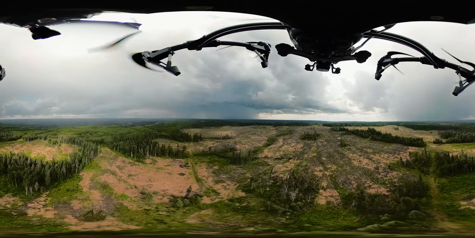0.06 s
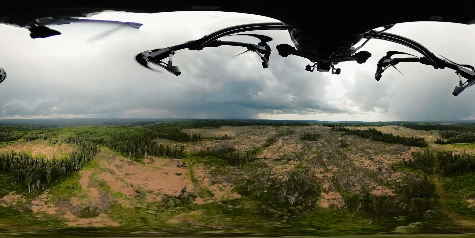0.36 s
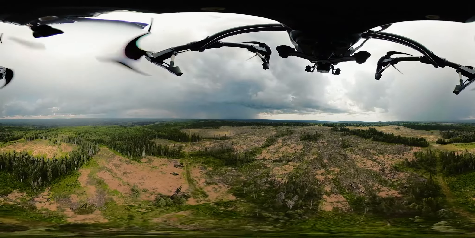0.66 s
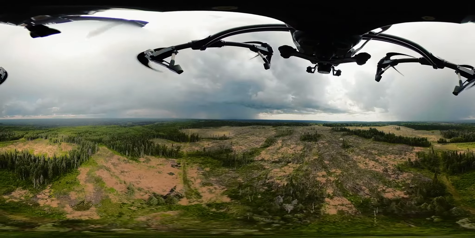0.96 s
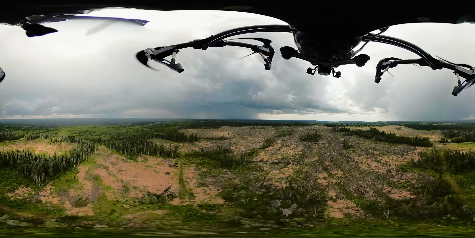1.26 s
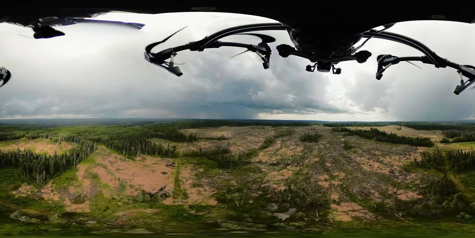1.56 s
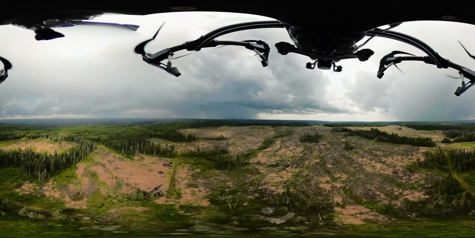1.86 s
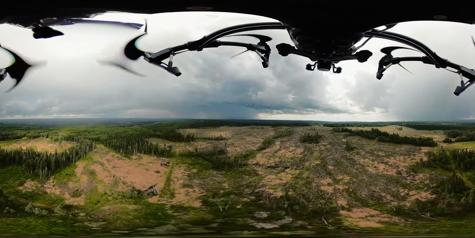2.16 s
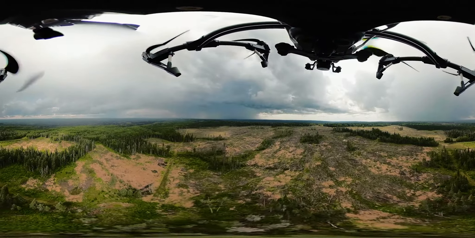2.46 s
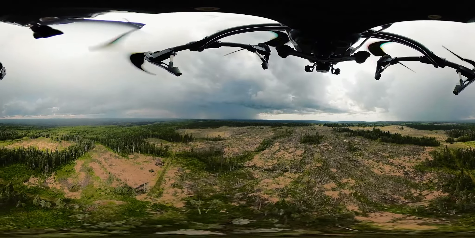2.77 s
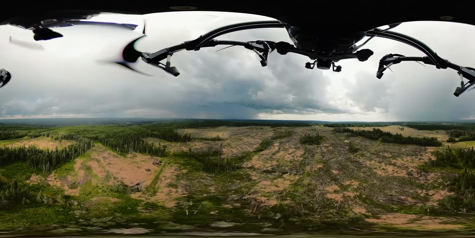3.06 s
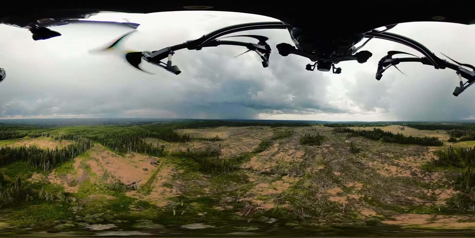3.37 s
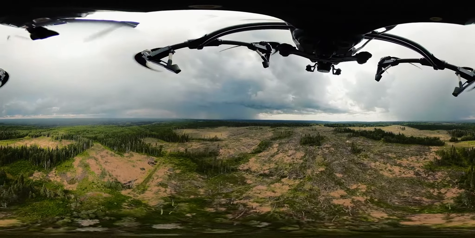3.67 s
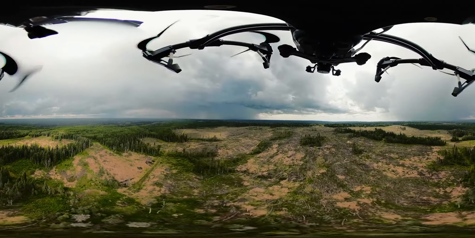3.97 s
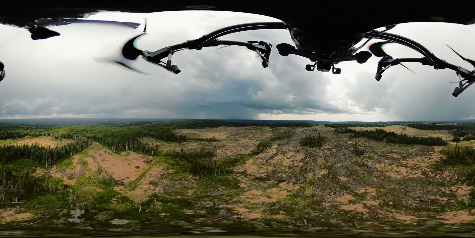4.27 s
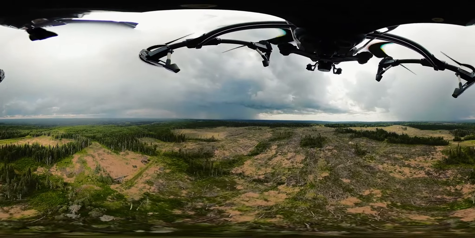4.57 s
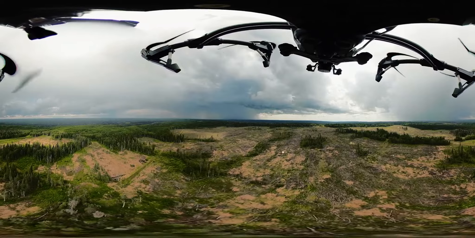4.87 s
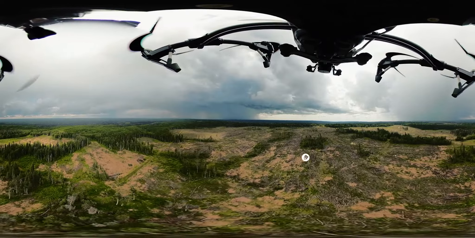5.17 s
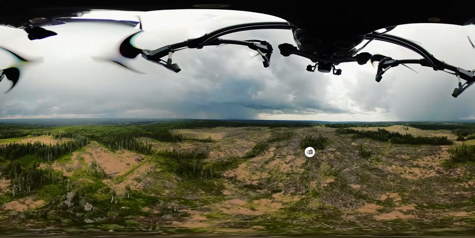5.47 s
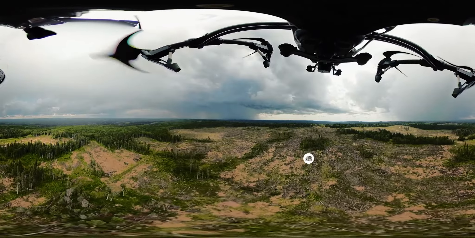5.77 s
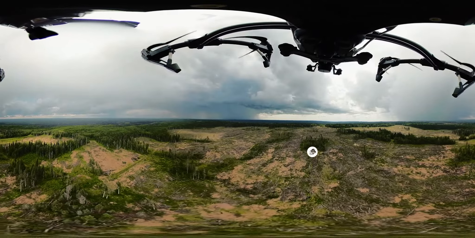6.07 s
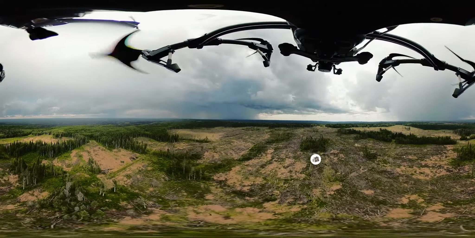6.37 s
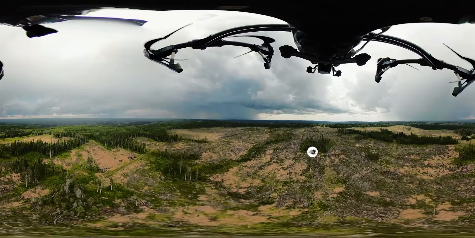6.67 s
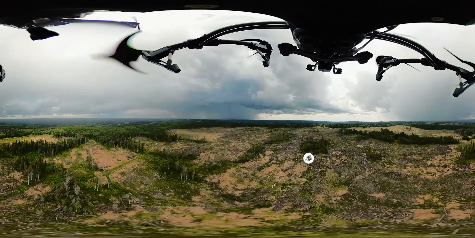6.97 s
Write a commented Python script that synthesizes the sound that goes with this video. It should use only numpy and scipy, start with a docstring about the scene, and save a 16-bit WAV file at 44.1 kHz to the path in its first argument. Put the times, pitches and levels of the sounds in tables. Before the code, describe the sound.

A low, rough rumble of tumbling air runs from start to finish, heard from a microphone carried by a drone in the open air. Gusts and the downdraft from the rotors keep striking it with short, uneven thumps. A faint, high, finely pulsing hiss from the blades sits far behind the wind, along with an occasional thin tick.

```python
"""Wind and rotor wash (air pushed down by the blades) rumble on a flying drone's camera microphone.
The air tumbles past in gusts, full of eddies: swirls of every size. Single strong eddies thump and rasp.
Much more quietly, the blades hiss in pulses as they sweep past,
and the hardest gusts carry thin, bright ticks."""
import sys
import numpy as np
from scipy import signal
from scipy.fft import rfft, irfft
from scipy.io import wavfile
from scipy.ndimage import uniform_filter1d

SR = 44100
rng = np.random.default_rng(int(sys.argv[2]) if len(sys.argv) > 2 else 0)


def digitize_waveform(pressure):
    """Quantize a signal to 16-bit integers and store it at the path in sys.argv[1].

    Rows of a 2-D input are taken as channels; values are limited to [-1, 1].
    """
    field = np.atleast_2d(pressure).T
    bounded = np.clip(field, -1, 1)
    quanta = np.round(bounded * 32767).astype(np.int16)
    wavfile.write(sys.argv[1], SR, quanta)


N = 313551
TIME = np.arange(N) / SR
FREQ = np.maximum(np.arange(N // 2 + 1) * SR / N, 1)

# How strong the tumbling air is at each frequency: frequency_hz, gain_db
WIND_TONE = [(10, -27.5), (25, -15.5), (42, -6.5), (60, -10.5), (100, -6.5), (140, -2.5), (190, 1),
             (260, -4.5), (370, -13), (550, -21), (1000, -32.5), (2000, -48), (4000, -66), (10000, -93.5)]
# Strong eddies that hit the microphone: time_s, relative_thump_db, relative_rasp_db
STRONG_EDDIES = [(0.106, -34, -39.5), (0.239, -9.5, -35), (0.309, -16.5, -53.5), (0.345, -18.5, -56),
                 (0.366, -19, -53), (0.408, -19, -37.5), (0.472, -15, -47), (0.506, -13.5, -51),
                 (0.649, -20, -44), (0.719, -16, -61), (0.828, -22.5, -44.5), (1.07, -12.5, -50),
                 (1.383, -27, -43.5), (1.425, -20.5, -45.5), (1.735, -16, -50), (2.171, -23, -44),
                 (2.224, -20, -47), (2.296, -15, -42), (2.368, -19.5, -46.5), (2.411, -22.5, -53.5),
                 (2.774, -30, -49.5), (2.824, -21.5, -44.5), (2.956, -25.5, -47), (3.138, -11.5, -38),
                 (3.274, -16.5, -41.5), (3.355, -18, -44), (3.584, -13, -36.5), (3.788, -15.5, -48),
                 (3.832, -21, -45), (3.966, -13, -60), (4.139, -24.5, -39.5), (4.511, -26.5, -42),
                 (4.616, -12, -45.5), (4.829, -15, -44.5), (4.923, -21, -43), (5.133, -13.5, -38.5),
                 (5.587, -20, -41.5), (5.611, -18.5, -41.5), (5.74, -19.5, -49.5), (5.973, -26, -37.5),
                 (6.026, -12.5, -60), (6.056, -28, -38.5), (6.199, -22, -38.5), (6.268, -12, -33.5),
                 (6.403, -16.5, -45), (6.463, -16, -39.5), (6.703, -20, -42.5), (6.832, -11.5, -47)]


def undb(db):
    """Turn decibels into a gain to multiply by."""
    return 10 ** (np.asarray(db) / 20)


def curve(table):
    """Join (time, value) rows with straight lines."""
    times, values = np.transpose(table)
    return np.interp(TIME, times, values)


def colour(points):
    """A gain for every frequency, from a few (Hz, dB) points."""
    hz, db = np.transpose(points)
    return undb(np.interp(np.log(FREQ), np.log(hz), db))


def shape(x, gain):
    """Filter a sound with a gain for every frequency."""
    return irfft(rfft(x) * gain, N)


def noise(gain):
    """Filtered noise with a typical size (rms) of 1."""
    x = shape(rng.standard_normal(N), gain)
    return x / np.std(x)


def wobble(rate_hz):
    """A smooth random wobble, mostly slower than the given rate."""
    return noise(np.exp(-(FREQ / rate_hz) ** 2))


def even_out(x, span_s):
    """Hold the level steady, keeping only changes quicker than the span."""
    size = int(span_s * SR)
    return x / np.sqrt(uniform_filter1d(uniform_filter1d(x ** 2, size), size) + 1e-12)


def gusts(rate_hz=14.2):
    """Quick random swings of the airflow, with no slow drift."""
    return noise(FREQ / np.hypot(FREQ, 4) * np.exp(-(FREQ / rate_hz) ** 2))


def swells(levels_db, half_length_s=0.0085):
    """The air swells briefly around each strong eddy; an average one gives a bump of height 1."""
    strength = np.sqrt(undb(levels_db))
    bumps = np.zeros(N)
    for (time_s, _, _), height in zip(STRONG_EDDIES, strength / np.mean(strength)):
        near = slice(*np.searchsorted(TIME, [time_s - .06, time_s + .06]))
        bumps[near] += height * np.exp(-((TIME[near] - time_s) / half_length_s) ** 2)
    return bumps


def airflow(gust_db=1.73, swell_db=3.5, fine_gust_db=0.38, fine_swell_db=4.0, fine_below_db=21):
    """Levels in dB of the rumble and of the fine, small eddies: both rise and fall with the flow."""
    # Strength of the air flowing over the microphone: time_s, level_db
    flow_levels = [(0.0, -24.5), (0.19, -34), (0.25, -28), (0.48, -30), (0.55, -34), (0.7, -30),
                   (1.15, -30.5), (1.52, -28), (1.65, -32.5), (2.12, -29), (2.28, -27.5), (2.45, -30.5),
                   (3.8, -29), (4.35, -30.5), (5.55, -29.5), (5.75, -28), (5.9, -30.5), (7.11, -29.5)]
    flow = curve(flow_levels)
    average = np.mean(flow)
    _, thump_db, rasp_db = np.transpose(STRONG_EDDIES)
    swing = flow - average + gust_db * gusts()
    rumble = swing + swell_db * swells(thump_db)
    fine = 0.94 * swing + fine_gust_db * gusts() + fine_swell_db * swells(rasp_db)
    return average + rumble, average + fine - fine_below_db


def wind_rumble(rumble_trim_db=-0.39, coarse_burst_db=2.0, fine_burst_db=5.0, flutter_db=1.5, burst_hz=55):
    """Eddies of every size rumble; small ones come in shared bursts as the large ones break up."""
    # Open wind blowing across the drone's path: time_s, deep_rumble_boost_db
    open_wind = [(0, -6.5), (0.3, 7), (0.6, -1), (1.3, 2.5), (1.8, -1), (3.0, -1), (3.6, 0), (4.2, -1),
                 (5.3, 0), (5.9, 1.5), (7.11, 2)]
    open_wind_db = curve(open_wind)
    tone = colour(WIND_TONE)
    rumble_db, turbulence_db = airflow()
    bursts = noise(FREQ / (FREQ + 10) / np.sqrt(1 + (FREQ / burst_hz) ** 2) / (1 + (FREQ / 450) ** 2))
    coarse_power = np.sum(tone[(FREQ > 100) & (FREQ < 400)] ** 2)
    fine_power = np.sum(tone[(FREQ > 600) & (FREQ < 2500)] ** 2)
    coarse_db = rumble_db + rumble_trim_db - 10 * np.log10(coarse_power)
    fine_db = turbulence_db - 10 * np.log10(fine_power)
    # the deepest rumble belongs to the open wind and only loosely follows the gusts of the wash
    deep_shift_db = 0.5 * (np.mean(coarse_db) - coarse_db) + open_wind_db
    rumble = 0
    for hz in 24 * 2. ** np.arange(9):  # one band of noise per octave; smaller eddies sound higher
        band = tone * np.cos(np.pi / 2 * np.clip(np.log2(FREQ / hz), -1, 1))
        smallness = np.clip(np.log(hz / 190) / np.log(1100 / 190), 0, 1)
        depth = np.clip(np.log(150 / hz), 0, 1)
        level_db = coarse_db + smallness * (fine_db - coarse_db) + depth * deep_shift_db
        burst_db = coarse_burst_db + smallness * (fine_burst_db - coarse_burst_db)
        eddies = noise(band) * undb(burst_db * bursts + flutter_db * wobble(90))
        eddies = even_out(eddies, span_s=0.065 * (1 + 2 * depth))
        rumble = rumble + eddies * undb(level_db) * np.sqrt(np.sum(band ** 2))
    return rumble


def blade_hiss(boost_db=2, sharpness=2.6, steady_power=0.19, flutter_db=2, wander=0.011, flicker_db=0.66):
    """Each blade sweeps its hiss past the microphone; every rotor wavers around its own speed."""
    # How often a blade of the nearest rotor passes: time_s, rate_hz
    blade_rate = [(0, 191.1), (1.3, 186.5), (2.3, 190), (3.2, 191.4), (4.6, 183), (5.2, 188.3), (6.4, 180),
                  (7.1, 186)]
    # The four rotors: speed_compared_to_nearest, relative_level_db
    rotors = [(0.98, -3.5), (1, -9), (.79, -5.5), (.94, -8)]
    # Tone of the hiss inside the camera housing: frequency_hz, gain_db
    hiss_tone = [(2500, -7), (4300, -14.5), (5000, -5), (5500, 0), (6300, -5), (7300, -1.5), (8100, -6),
                 (8600, -14.5), (9400, -20), (10500, -10.5), (11300, -6.5), (12400, 1), (14000, -3.5),
                 (15700, -7)]
    # How hard the blades push the air: time_s, relative_hiss_db
    thrust = [(0.0, -62.5), (0.15, -66), (0.6, -64.7), (0.75, -67.5), (1.2, -65.5), (2.0, -67.9),
              (2.15, -65.4), (3.6, -67.6), (3.9, -64.8), (4.6, -69.5), (4.7, -66), (5.1, -67), (5.2, -65.0),
              (5.55, -66.7), (5.65, -65.1), (7.1, -66.5)]
    rate_hz, power = curve(blade_rate), steady_power
    for speed, level_db in rotors:
        phase = 2 * np.pi * np.cumsum(rate_hz * speed * (1 + wander * wobble(6))) / SR
        sweep = np.exp(2 * sharpness * (np.cos(phase) - 1))  # one pulse per passing blade
        power = power + 2 * sweep * undb(level_db + flutter_db * wobble(120)) ** 2
    pulsing = np.sqrt(power / np.mean(power))
    # the highest hiss beams out from the blade and pulses most; the lower part spreads evenly
    beam_share = 1 / (1 + (8000 / FREQ) ** 4)
    tone = colour(hiss_tone)
    beamed = pulsing * shape(rng.standard_normal(N), tone * np.sqrt(beam_share))
    spread = shape(rng.standard_normal(N), tone * np.sqrt(1 - beam_share))
    hiss = beamed + spread
    return hiss / np.std(hiss) * undb(curve(thrust) + boost_db + flicker_db * gusts())


def weak_eddies(count=120, per_second=8, thump_db=-25, rasp_db=-46, scatter_db=1.5):
    """Weaker eddies arrive at loose, random times; the rows have the same columns as STRONG_EDDIES."""
    delay, thump, rasp = rng.standard_normal((count, 3)).T
    times = (np.arange(count) + .5 + .5 * delay) / per_second
    rows = np.column_stack([times, thump_db + scatter_db * thump, rasp_db + scatter_db * rasp])
    return rows[(times > 0) & (times < TIME[-1])]


def eddy_thumps(eddies, thump_trim_db=-2, rasp_trim_db=-1, core_s=0.0013, rasp_s=0.0018, leak_hz=150):
    """An eddy's core pushes or pulls on the microphone: a thump, wrapped in a rasp of tiny eddies."""
    thumps, rasps = np.zeros(N), np.zeros(N)
    tiny_eddies = noise(colour(WIND_TONE) / (1 + (850 / FREQ) ** 4))
    for time_s, thump_db, rasp_db in eddies:
        side, width = rng.standard_normal(2)
        near = slice(max(int((time_s - .03) * SR), 0), int((time_s + .03) * SR))
        t = TIME[near] - time_s
        distance = t / (core_s * np.exp(0.14 * width))
        thumps[near] += 2 * np.sign(side) * undb(thump_db + thump_trim_db) / (1 + distance ** 2) ** 1.78
        rasps[near] += undb(rasp_db + rasp_trim_db) / (1 + (t / rasp_s) ** 2)
    # slow pressure changes leak around the microphone's membrane, so each pulse overshoots on both sides
    leak = 1 / np.sqrt(1 + (leak_hz / FREQ) ** 6)
    return shape(thumps, leak) + rasps * tiny_eddies


def gust_ticks(fade_s=0.00058, low_hz=2000, top_hz=3800):
    """Each tick is about a millisecond of bright noise."""
    # Thin ticks in the hardest gusts: time_s, level_db
    ticks = [(0.241, -42), (.409, -58), (1.07, -57), (2.368, -56), (3.14, -54), (3.273, -49), (4.615, -54),
             (5.587, -48), (5.593, -51), (6.272, -56)]
    loudness = 0
    for time_s, level_db in ticks:
        loudness = loudness + undb(level_db) * np.exp(-np.minimum(np.abs(TIME - time_s) / fade_s, 20))
    return loudness * noise(1 / (1 + (low_hz / FREQ) ** 4) / (1 + (FREQ / top_hz) ** 3))


def scene():
    """Rumble, hiss, ticks and thumps meet at one microphone."""
    air = wind_rumble() + blade_hiss() + gust_ticks()
    eddies = np.vstack([STRONG_EDDIES, weak_eddies()])
    return (air + eddy_thumps(eddies))[None]


def record(dry):
    """The camera sharply cuts off the highest treble."""
    top_hz = 15760
    return signal.sosfilt(signal.ellip(14, .1, 80, top_hz, fs=SR, output="sos"), dry)


dry = scene()
out = record(dry)
digitize_waveform(out)
```